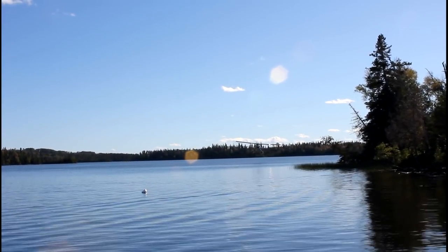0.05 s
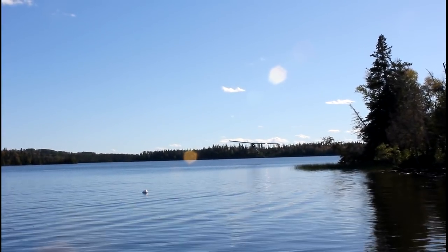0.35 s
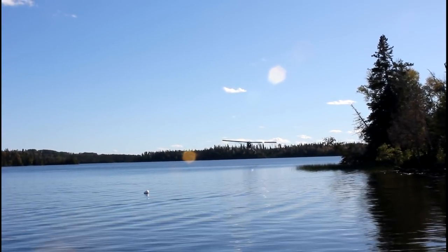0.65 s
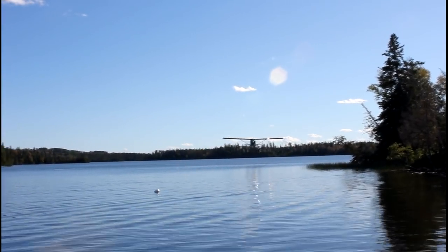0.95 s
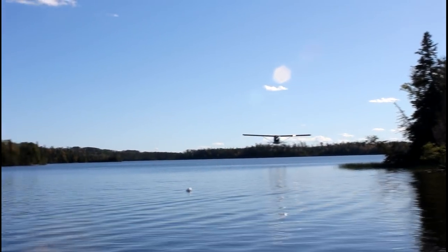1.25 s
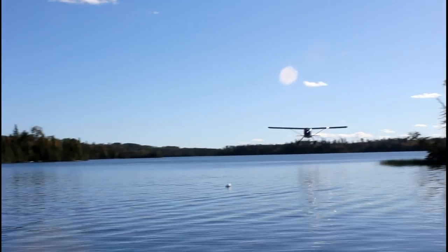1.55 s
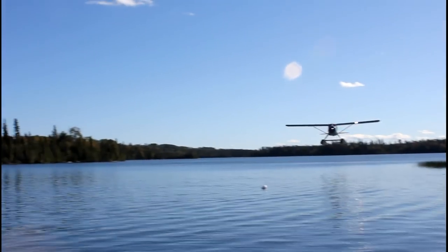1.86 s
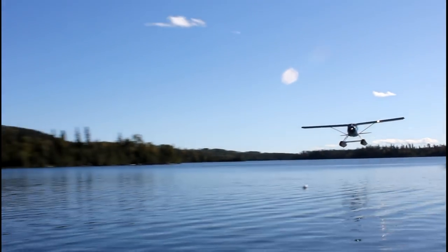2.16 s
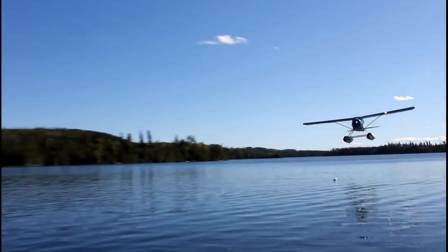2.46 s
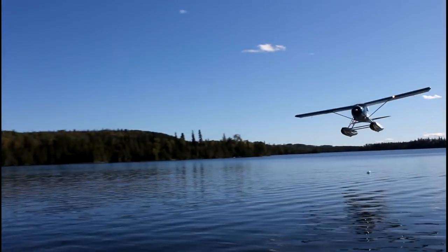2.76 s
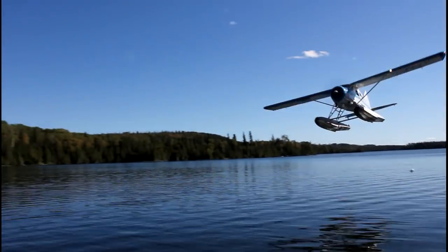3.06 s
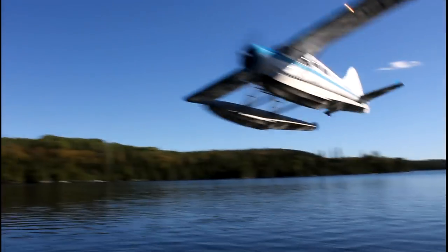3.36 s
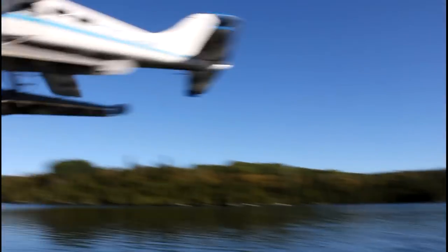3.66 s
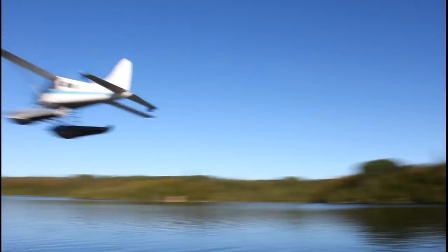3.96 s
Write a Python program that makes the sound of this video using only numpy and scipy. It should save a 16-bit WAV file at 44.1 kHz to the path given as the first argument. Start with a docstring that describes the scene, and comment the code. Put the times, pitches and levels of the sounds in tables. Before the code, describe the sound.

A float plane's piston engine drones and rasps over open water, its rush of air brightening as it nears. Near the end it passes right by the microphone, blades swishing, and the engine note falls.

```python
"""A nine-cylinder radial engine drives a float plane low over a lake, towards the listener and close by.
Its exhaust puffs drone and rasp, and the Doppler effect lowers their pitch at the pass. The propeller's
rush brightens as less air lies in between to absorb it; abeam, the blades hum and swish once a turn.
Interference with the reflection off the water sweeps a comb of notches down through the sound,
and an automatic gain control holds the level."""
import sys
import numpy as np
from scipy import signal
from scipy.io import wavfile
from scipy.ndimage import uniform_filter1d

SR = 44100
rng = np.random.default_rng(int(sys.argv[2]) if len(sys.argv) > 2 else 0)


def wrap_up_sound(samples):
    """Save the sound to the file named by the first command line argument, as 16-bit audio."""
    columns = np.atleast_2d(samples).T
    # keep every value between -1 and 1, then stretch to whole-number steps
    tamed = np.clip(columns, -1, 1)
    steps = np.round(tamed * 32767).astype(np.int16)
    wavfile.write(sys.argv[1], SR, steps)


N = 176400
TIME = np.arange(N) / SR
SOUND_M_PER_S = 343
SPEED_M_PER_S, CLOSEST_M, PASS_S = 52, 13, 3.635

# Crankshaft speed: (time [s], speed [rev/min])
ENGINE_SPEED = [(0, 1918.8), (.4, 1911.8), (1.05, 1912.2), (1.4, 1922.7), (2, 1909.9), (2.55, 1903.4),
                (3.2, 1910.5), (3.55, 1924), (4, 1900)]


def from_db(db):
    """Amplitude ratio of a level in decibels."""
    return 10 ** (np.asarray(db) / 20)


def unit_rms(x):
    """Normalisation to unit mean power."""
    return x / np.sqrt(np.mean(x ** 2) + 1e-20)


def in_time(rows):
    """Linear interpolation of a table's value columns at every sample."""
    times, *columns = np.transpose(rows)
    return [np.interp(TIME, times, column) for column in columns]


def at_hz(spectrum, hz):
    """Interpolation of a spectrum on a log-frequency axis."""
    frequencies, levels = np.transpose(spectrum)
    return np.interp(np.log(hz), np.log(frequencies), levels)


def drift(rate_hz):
    """Random fluctuation: low-passed noise with a spread of 1."""
    step, settle = 40, 2000
    pole = np.exp(-2 * np.pi * step * rate_hz / SR)
    white = rng.standard_normal(N // step + settle + 2)
    slow = signal.lfilter([1], [1, -2 * pole, pole * pole], white)[settle:]
    return np.interp(np.arange(N) / step, np.arange(len(slow)), unit_rms(slow))


def flight():
    """Propagation delay gives the distance, Doppler ratio and crank turns (0 at the pass) as heard."""
    sent_s = np.linspace(-6, 2, 8000)
    path_m = np.hypot(SPEED_M_PER_S * sent_s, CLOSEST_M)
    heard_s = PASS_S + sent_s + (path_m - CLOSEST_M) / SOUND_M_PER_S
    doppler = np.interp(TIME, heard_s, np.gradient(sent_s, heard_s))
    turns = np.cumsum(doppler * in_time(ENGINE_SPEED)[0] / 60) / SR
    return np.interp(TIME, heard_s, path_m), doppler, turns - np.interp(PASS_S, TIME, turns)


def puff_cycles(cylinders=9, first_firing=0.24, longest_detour_s=0.00353):
    """Unequal paths round the collector ring space the puffs unevenly; times in two-turn cycles."""
    k = np.arange(cylinders)
    outlet = 0.63  # its place between two cylinders
    ring_position = (2 * k + outlet) % cylinders / cylinders  # every other cylinder fires in turn
    detour_s = abs(2 * ring_position - 1) * longest_detour_s
    return first_firing + k / cylinders + detour_s * ENGINE_SPEED[0][1] / 120


def exhaust_drone(doppler, turns, pipe_hz=169, pipe_q=7.2, jitter_s=0.00003, waver_db=0.76):
    """Periodic puffs form a harmonic series, its phases set by their spacing and tailpipe resonance."""
    # Exhaust harmonics: (order [multiple of the engine cycle rate], relative level [dB])
    harmonics = [(1, -51), (2, -35), (3, -54), (4, -40), (5, -17), (6, -16), (7, -7), (8, -48), (9, -7),
                 (10, -10.5), (11, 1.5), (12, -7.5), (13, -3.5), (14, -3.5), (15, -4), (16, -7), (17, -8),
                 (18, -6.5), (19, -13), (20, -65), (21, -5.5), (22, -17), (23, -9.5), (24, -10), (25, -14),
                 (26, -13.5), (27, -16.5), (28, -19), (29, -16), (30, -20), (31, -16), (32, -24), (33, -13),
                 (34, -24), (35, -25.5), (36, -21), (37, -25), (38, -26), (39, -44), (40, -23), (41, -46),
                 (42, -24), (43, -23), (44, -21), (45, -33), (46, -32)]
    cycles = turns / 2 + jitter_s * drift(25) * ENGINE_SPEED[0][1] / 120
    aft_db_per_octave = 8.5 * np.clip((1 - doppler) / (1 - doppler[-1]), 0, 1)  # brighter from behind
    drone, puffs = 0, puff_cycles()
    for order, db in harmonics:
        tuning = order * ENGINE_SPEED[1][1] / 120 / pipe_hz
        puff_phasor = np.exp(-2j * np.pi * order * puffs).sum()
        phase = np.angle(puff_phasor / (1 + 1j * pipe_q * (tuning - 1 / tuning)))
        line_db = db + aft_db_per_octave * np.log2(tuning) + waver_db * drift(2.6)
        drone -= from_db(line_db) * np.cos(2 * np.pi * order * cycles + phase)
    return unit_rms(drone)


def exhaust_rasp(doppler, turns, grit_decay_s=0.0042, top_hz=4800):
    """Impulse excitation: each puff's sharp, gritty front rings the exhaust's upper resonances."""
    # Resonances as heard on approach: (frequency [Hz], bandwidth [Hz], level [dB])
    resonances = [(810, 63, -21), (892, 46, -24), (1140, 49, -23.5), (1368, 48, -18.5), (1680, 64, -26),
                  (1974, 110, -25.5), (2640, 81, -28), (4240, 640, -21)]
    samples, source_clock = np.arange(N), np.cumsum(doppler / doppler[0])
    cycles = np.interp(samples, source_clock, turns / 2)
    fronts = sum(np.diff(np.floor(cycles - at), prepend=np.floor(cycles[0] - at)) for at in puff_cycles())
    grit_envelope = signal.lfilter([1], [1, -np.exp(-1 / (grit_decay_s * SR))], fronts + 1e-18)
    excitation = unit_rms(fronts) + unit_rms(grit_envelope * rng.standard_normal(N))
    ringing = 0
    for hz, width_hz, db in resonances:
        resonator = signal.iirpeak(hz, hz / width_hz, fs=SR)
        ringing += from_db(db) * unit_rms(signal.lfilter(*resonator, excitation))
    doppler_shifted = np.interp(source_clock, samples, ringing)
    return signal.sosfilt(signal.butter(6, top_hz, fs=SR, output="sos"), doppler_shifted)


def blade_hum(distance, turns, blades=3, focus=0.81, waver_db=3):
    """The blades beat the air at the blade-passing frequency; the tone is beamed sideways."""
    abeam = (CLOSEST_M / distance) ** focus
    return from_db(-23.5 + waver_db * drift(23)) * abeam * np.sin(2 * np.pi * blades * turns)


def turbulence(spectrum, distance, doppler, throb=0, throb_below_hz=13000, flicker_db=0.5):
    """Turbulent noise in third octaves, Doppler-shifted and dulled by atmospheric absorption."""
    edges = 25 * 2 ** (np.arange(29) / 3)
    white, noise, power = rng.standard_normal((2, N)), 0, 0
    for k, (low, high) in enumerate(zip(edges, edges[1:])):
        hz = np.sqrt(low * high)
        bandpass = signal.butter(4, [low, high], "band", fs=SR, output="sos")
        band = unit_rms(signal.sosfilt(bandpass, white[k % 2])) * np.sqrt(high - low)
        absorbed_db = 0.1353 * distance * (hz / 10000) ** 1.5
        db = at_hz(spectrum, hz * doppler[0] / doppler) - absorbed_db + flicker_db * drift(29)
        modulation = 1 + throb / (1 + (hz / throb_below_hz) ** 2)
        noise += band * from_db(db) * modulation
        power += (high - low) * from_db(at_hz(spectrum, hz)) ** 2
    return noise / np.sqrt(power)


def rush(distance, doppler, turns, throb_depth=0.12):
    """Turbulence of propeller air and exhaust gas, amplitude-modulated by the puffs."""
    # Rush before absorption: (frequency [Hz], relative spectral density [dB])
    spectrum = [(30, -35), (60, -42), (100, -9), (160, -2.5), (240, 2.5), (430, 3.5), (540, -7),
                (680, -7.5), (860, -4.5), (1200, -6), (2200, -11), (3600, -10.5), (6000, -16), (10000, -24),
                (15000, -27.5)]
    puffs = sum(np.exp(300 * (np.cos(2 * np.pi * (turns / 2 - at)) - 1)) for at in puff_cycles())
    throb = throb_depth * (puffs - puffs.mean()) / puffs.std()
    return turbulence(spectrum, distance, doppler, throb)


def tip_swish(distance, doppler, turns, swish_db=7.5, crackle_db=2.5):
    """Turbulence at the blade tips radiates sideways, swelling once a turn and tearing irregularly."""
    # Hiss and low buffeting: (frequency [Hz], relative spectral density [dB])
    spectrum = [(30, -12), (75, -9), (200, -20), (600, -36), (1500, 2), (3000, 0.5), (8000, -2),
                (12000, -2), (15000, -3)]
    # Rise as the propeller comes abeam: (time [s], level [dB])
    abeam_level = [(0, -77), (2.8, -45), (3.25, -33.5), (3.53, -30.5), (3.58, -22.5), (3.64, -23),
                   (3.68, -25), (3.77, -22), (3.8, -24), (3.83, -28.5), (4, -26)]
    swish = abs(np.cos(np.pi * (turns - 0.11))) ** 1.3
    level_db = in_time(abeam_level)[0] + swish_db * (swish - 0.5) + crackle_db * drift(130)
    return from_db(level_db) * turbulence(spectrum, distance, doppler)


def over_water(direct, distance, ear_height_m=1.542, reflection=0.57):
    """Comb filtering: the image source in the lake lags more as the plane nears; ripples smear it."""
    # The plane above the water: (time [s], height [m])
    altitude = [(0, 4.9), (2, 5.47), (2.8, 6.1), (3, 5.7), (3.25, 6.37), (3.45, 6.63), (3.6, 6.55),
                (3.75, 8.2), (4, 9.5)]
    detour_m = np.sqrt(distance ** 2 + 4 * ear_height_m * in_time(altitude)[0]) - distance
    lag = detour_m / SOUND_M_PER_S * SR
    blur = 0.00012 * SR + 0.19 * lag  # the image is averaged over this many samples
    samples, integral = np.arange(N), np.cumsum(direct) - direct / 2
    early, late = (np.interp(samples - lag - side * blur / 2, samples, integral) for side in (-1, 1))
    return direct + reflection * (early - late) / blur


def scene():
    """The plane's sources superpose; by spherical spreading, amplitude varies as 1 / distance."""
    # Swells and dips of the drone and of the rasp and rush as the plane nears and passes:
    # (time [s], drone level [dB], rasp and rush level [dB])
    loudness = [(0, -15.5, -21.5), (1.0, -16, -21), (1.55, -18, -24), (1.72, -16, -19.5),
                (2.28, -17.5, -24), (2.42, -16, -21.5), (2.8, -18, -24.5), (2.95, -13.5, -19.5),
                (3.15, -15, -21.5), (3.28, -14.5, -17), (3.42, -15, -18), (3.54, -15, -16.5),
                (3.61, -14.5, -22.5), (3.66, -21.5, -19.5), (3.77, -20.5, -19.5), (3.86, -25, -20.5),
                (4, -24.5, -23.5)]
    distance, doppler, turns = flight()
    drone_db, rush_db = in_time(loudness)
    plane = from_db(drone_db) * exhaust_drone(doppler, turns)
    plane += from_db(rush_db) * exhaust_rasp(doppler, turns)
    plane += blade_hum(distance, turns)
    plane += from_db(rush_db) * rush(distance, doppler, turns)
    plane += tip_swish(distance, doppler, turns)
    spreading = distance[0] / distance
    return (over_water(plane, distance) * spreading / 2)[None]


def record(dry, target_db=-14, strength=0.96, average_s=0.14, recover_db_per_s=6.5):
    """Automatic gain control turns down as the sound grows and recovers slowly; bass and top are cut."""
    low_cut = signal.butter(3, 66, "high", fs=SR, output="sos")
    high_cut = signal.ellip(12, 0.1, 80, 15750, fs=SR, output="sos")
    dry = signal.sosfilt(low_cut, dry)
    level_db = 10 * np.log10(uniform_filter1d(dry[0] ** 2, int(average_s * SR)) + 1e-12)
    recovery_db = recover_db_per_s * TIME
    held_db = np.maximum.accumulate(level_db + recovery_db) - recovery_db
    return signal.sosfilt(high_cut, dry * from_db(-strength * (held_db - target_db)))


dry = scene()
out = record(dry)
wrap_up_sound(out)
```